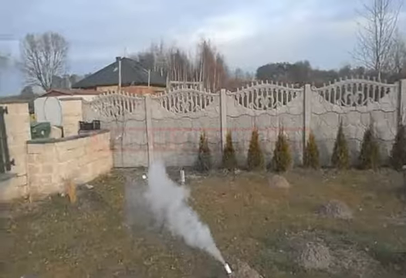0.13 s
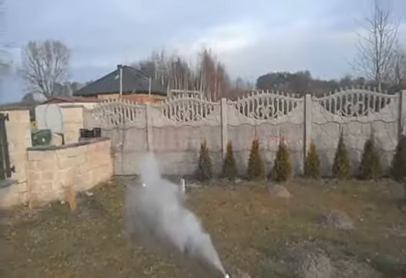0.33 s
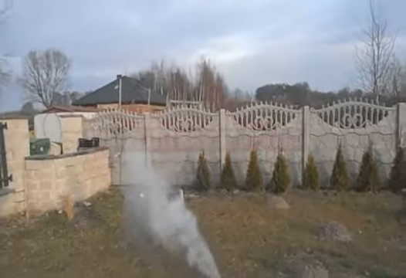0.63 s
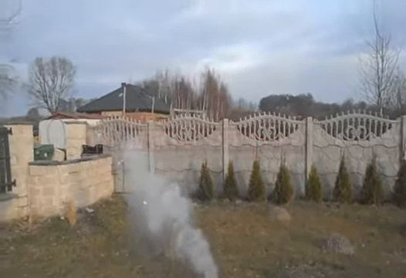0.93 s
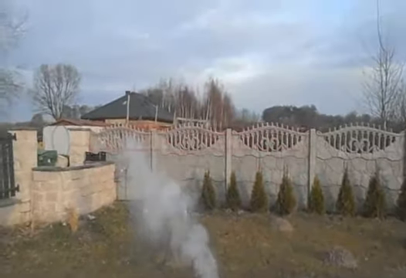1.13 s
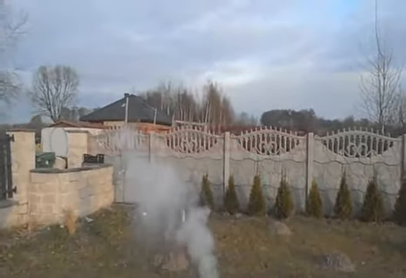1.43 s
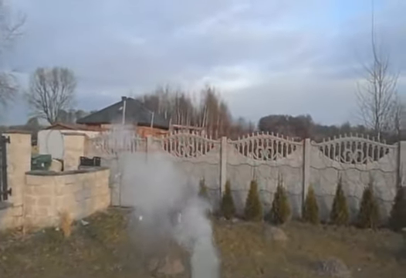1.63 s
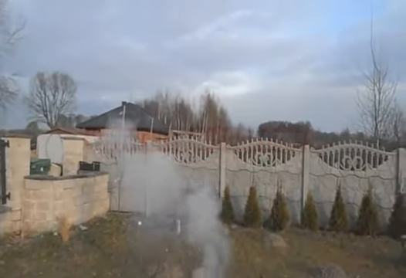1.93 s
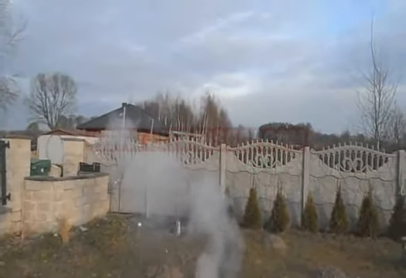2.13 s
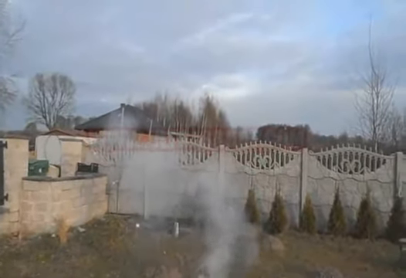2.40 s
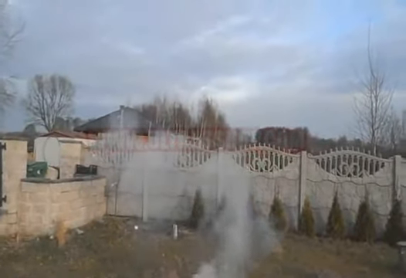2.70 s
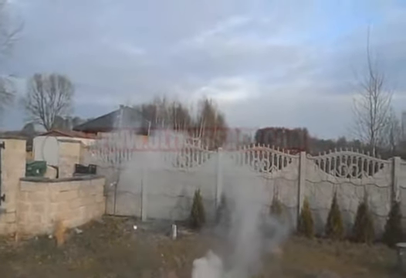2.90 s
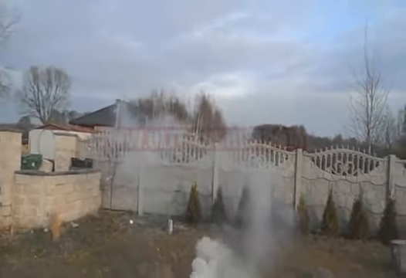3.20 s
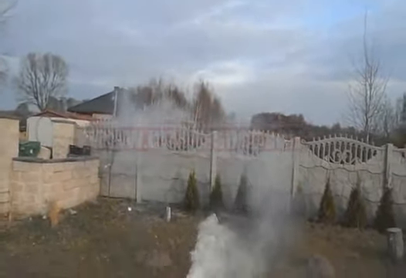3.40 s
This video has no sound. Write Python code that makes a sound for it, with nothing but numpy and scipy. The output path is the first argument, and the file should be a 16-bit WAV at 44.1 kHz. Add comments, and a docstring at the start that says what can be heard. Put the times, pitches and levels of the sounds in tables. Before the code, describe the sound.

A smoke canister on a lawn vents with a strong bright hiss, cutting in abruptly, gaining a low roar, then pulsing and fading over faint wind rumble; small mono camera microphone outdoors.

```python
"""After a short silence the sound cuts in abruptly: a smoke canister vents on a lawn near a small mono
camera microphone. Its jet is noise in four pitch regions, with turbulent flutter and slower surges.
The treble starts loudest; the low roar swells after one second, following three soft bumps of wind.
As the pressure falls the jet pulses and fades, with one more bump late on.
Low wind rumble and a distant rush, both shaped noise, run underneath from the cut-in to the end."""
import sys
import numpy as np
from scipy import signal
from scipy.fft import rfft, irfft, next_fast_len
from scipy.io import wavfile

SR = 44100
rng = np.random.default_rng(int(sys.argv[2]) if len(sys.argv) > 2 else 0)


def persist_wave(psi):
    """Save psi, clipped to +-1, as 16-bit WAV."""
    counts = np.round(np.clip(psi, -1, 1) * 32767).astype(np.int16)
    wavfile.write(sys.argv[1], SR, np.atleast_2d(counts).T)


def makeup_ratio(level_db):
    """Linear amplitude ratio for a level in decibels (20 dB per factor of ten)."""
    decades = np.asarray(level_db, float) / 20
    return 10 ** decades


N = 156555  # length in samples

# Distant rush of the neighbourhood and microphone hiss: pitch_hz, relative level_db per Hz
YARD_COLOUR = [(60, -24), (150, -5), (300, 2.5), (500, 0.5), (750, -1.5), (1600, -6.5), (4600, -17.5),
               (12000, -13), (16000, -20)]
# Wind rumble on the microphone: pitch_hz, relative level_db per Hz
WIND_COLOUR = [(8.8, -31), (15, 2.5), (68, 5), (84, -1), (98, 1), (160, -23), (210, -49), (350, -120)]
# Soft wind bumps: start_s, level_db (before the swing is rounded off), pitch_hz
BUMPS = [(0.814, -23, 45.2), (.872, -26, 60), (0.966, -24, 60.7), (2.789, -24, 80)]
# Loudness of the jet's low roar over time: time_s, level_db
ROAR_LEVEL = [(.13, -34.5), (.45, -37), (.8, -38), (1.04, -39.5), (1.18, -32), (1.35, -33.5), (1.63, -35.5),
              (1.8, -31.5), (1.9, -35.5), (2.1, -35.5), (2.3, -35.5), (2.39, -33), (2.45, -42), (2.53, -39),
              (2.62, -50), (3.55, -50)]
# Loudness of the jet's body, around its 1.2 kHz resonance: time_s, level_db
BODY_LEVEL = [(.13, -33), (.5, -33), (.9, -32.5), (1.25, -30.5), (1.5, -31), (1.8, -31), (2.15, -30),
              (2.35, -34.5), (2.42, -34), (2.47, -38), (2.52, -35), (2.7, -38.5), (2.9, -41.5),
              (3.55, -45.5)]
# Loudness of the jet between body and treble: time_s, level_db
UPPER_LEVEL = [(.13, -33.5), (.5, -34), (.9, -34.5), (1.25, -32.5), (1.6, -33.5), (2.0, -37.5), (2.28, -36),
               (2.35, -38), (2.41, -36.5), (2.46, -40.5), (2.52, -38), (2.85, -45), (3.2, -44), (3.35, -48),
               (3.55, -47)]
# Loudness of the jet's treble hiss: time_s, level_db
HISS_LEVEL = [(0.13, -20), (0.19, -19), (0.23, -20.5), (1.08, -24), (1.27, -22.5), (1.76, -25.5),
              (1.79, -28.5), (1.83, -25), (2.24, -27.5), (2.26, -24), (2.35, -30), (2.41, -26),
              (2.46, -32.5), (2.48, -28.5), (2.85, -35.5), (3.28, -35), (3.33, -39), (3.55, -35)]
# Colour of jet, ground echo and microphone housing together, in the roar: pitch_hz, relative level_db per Hz
ROAR_COLOUR = [(53, -35), (90, -7), (177, 1), (235, -0.5), (394, -10.5), (460, -14.5), (620, -13),
               (810, -47), (1360, -120)]
# The same for the body and the region above it: pitch_hz, relative level_db per Hz
BODY_COLOUR = [(550, -17), (681, -14.5), (886, -4.5), (1050, -2), (1210, 1), (1350, -3), (1470, -11),
               (1590, -23.5), (1740, -13.5), (1910, -21), (2080, -15), (2350, -19.5), (2560, -16.5),
               (2760, -9), (3000, -11.5), (3260, -13.5), (3450, -13), (3930, -7), (4160, -9), (4450, -18.5),
               (4780, -19)]
# The same for the treble: pitch_hz, relative level_db per Hz
HISS_COLOUR = [(4780, -18.5), (4950, -8.5), (5300, -3), (5700, -1), (6150, 1.5), (6590, -2.5), (7050, 0),
               (7550, -4), (7900, -12), (8400, -10), (9170, -8), (10300, -10), (10900, -15), (11800, -17),
               (12200, -24), (13300, -24), (14500, -22.5), (15700, -28)]
# Faint delayed copies of the jet: delay_s, level_db
COPIES = [(0.0116, -18.5), (.023, -13.5)]
# Narrow dips of the microphone housing: pitch_hz, width_hz, depth_db
DIPS = [(12450, 180, -9)]

YARD_DB = -43.5
WIND_DB, GUST_DB, GUST_HZ = -43, 2, 6
SPLIT_LOW_HZ, SPLIT_MID_HZ, SPLIT_HIGH_HZ = 550, 1600, 4780  # borders of the jet's four regions
FLUTTER_DB, FLUTTER_HZ = 1.01, 122  # fast turbulence in the treble; jet() scales it for other regions
SURGE_DB, SURGE_HZ = 0.48, 11       # slower surges in the treble; jet() scales them likewise
PATCH_DB, PATCH_HZ = 0.35, 5.4      # separate wander of each third octave; the roar has twice the dB
COPY_CUT_HZ = 5000
START_S, OFFSET, CUTOFF_HZ = 0.1207, -0.0026, 15730  # abrupt start, constant shift, top of the microphone


def rms_one(x):
    """Scale a signal so that its average strength (rms) is 1."""
    return x / np.sqrt(np.mean(x ** 2) + 1e-20)


def in_time(rows):
    """Read a table of times and values at every sample, with straight lines between its points."""
    times, values = np.transpose(rows)
    return np.interp(np.arange(N) / SR, times, values)


def drift(rate_hz):
    """A random wander of spread 1: noise smoothed twice, computed at every eighth sample."""
    pole = np.exp(-16 * np.pi * rate_hz / SR)
    noise = rng.standard_normal(N // 8 + 4002)
    # The first 4000 values let the smoothing settle.
    slow = signal.lfilter([1], [1, -2 * pole, pole * pole], noise)[4000:]
    slow = rms_one(slow - slow.mean())
    return np.interp(np.arange(N) / 8, np.arange(len(slow)), slow)


def coloured(points, low_hz, high_hz, patch_db):
    """Noise of a given colour, in overlapping third-octave bands that each wander in level; rms 1."""
    size = next_fast_len(N)
    hz = np.maximum(np.arange(size // 2 + 1) * SR / size, 1)
    point_hz, point_db = np.transpose(points)
    colour_db = np.interp(np.log(hz), np.log(point_hz), point_db)
    spectrum = rfft(rng.standard_normal(size)) * makeup_ratio(colour_db)
    spectrum = spectrum * (hz > low_hz) * (hz < high_hz)
    place = 3 * np.log2(hz / low_hz)  # position counted in third octaves
    out = np.zeros(N)
    for k in range(int(3 * np.log2(high_hz / low_hz)) + 2):
        share = np.clip(1 - np.abs(place - k), 0, 1)
        band = irfft(spectrum * share, size)[:N]
        out += band * makeup_ratio(patch_db * drift(PATCH_HZ))
    return rms_one(out)


def yard():
    """Distant rush and microphone hiss: broad noise whose bands wander slightly."""
    return makeup_ratio(YARD_DB) * coloured(YARD_COLOUR, 76, 16000, 0.5)


def wind():
    """Wind rumble: low noise that rises and falls in gusts."""
    gusts = makeup_ratio(WIND_DB + GUST_DB * drift(GUST_HZ))
    return gusts * coloured(WIND_COLOUR, 10, 200, 0)


def bumps():
    """Each wind bump is one rounded swing of air pressure, down then up."""
    t = np.arange(N) / SR
    out = np.zeros(N)
    for start_s, level_db, pitch_hz in BUMPS:
        turn = np.clip((t - start_s) * pitch_hz, 0, 1)
        rounding = np.sin(np.pi * turn) ** 0.96
        out -= makeup_ratio(level_db) * np.sin(2 * np.pi * turn) * rounding
    return out


def delayed_copies(near):
    """Faint delayed, dulled copies of the jet, giving its spectrum a fine ripple."""
    dull = signal.sosfilt(signal.butter(2, COPY_CUT_HZ, fs=SR, output="sos"), near)
    return sum(makeup_ratio(level_db) * np.roll(dull, int(delay_s * SR)) for delay_s, level_db in COPIES)


def jet():
    """Turbulent noise in four regions: the flow's surges move all, its flutter all but the roar."""
    flutter = FLUTTER_DB * drift(FLUTTER_HZ)
    surge = SURGE_DB * drift(SURGE_HZ)
    roar = coloured(ROAR_COLOUR, 93, SPLIT_LOW_HZ, 2.0 * PATCH_DB)
    roar = rms_one(makeup_ratio(0.7 * surge) * roar)
    body = coloured(BODY_COLOUR, SPLIT_LOW_HZ, SPLIT_MID_HZ, PATCH_DB)
    body = rms_one(makeup_ratio(1.3 * flutter + 0.43 * surge) * body)
    upper = coloured(BODY_COLOUR, SPLIT_MID_HZ, SPLIT_HIGH_HZ, PATCH_DB)
    upper = rms_one(makeup_ratio(0.89 * flutter + 0.38 * surge) * upper)
    hiss = coloured(HISS_COLOUR, SPLIT_HIGH_HZ, 16000, PATCH_DB)
    hiss = rms_one(makeup_ratio(flutter + surge) * hiss)
    near = makeup_ratio(in_time(ROAR_LEVEL)) * roar + makeup_ratio(in_time(BODY_LEVEL)) * body
    near += makeup_ratio(in_time(UPPER_LEVEL)) * upper + makeup_ratio(in_time(HISS_LEVEL)) * hiss
    return near + delayed_copies(near)


def scene():
    """Add up all sources and put the same sound in both channels."""
    mono = yard() + wind() + bumps() + jet()
    return np.array([mono, mono])


def housing(x):
    """The microphone housing weakens narrow ranges of pitch."""
    hz = np.arange(N // 2 + 1) * SR / N
    dip_db = sum(depth_db * np.exp(-((hz - pitch_hz) / width_hz) ** 2) for pitch_hz, width_hz, depth_db in DIPS)
    return irfft(rfft(x) * makeup_ratio(dip_db), N)


def band_limit(x):
    """A steep low-pass at the top of the band."""
    return signal.sosfilt(signal.butter(12, 15740, fs=SR, output="sos"), x)


def record(dry):
    """Apply the housing dips, a steep top cut, a small constant shift and the abrupt start."""
    top_cut = signal.ellip(14, 0.2, 95, CUTOFF_HZ, fs=SR, output="sos")
    heard = signal.sosfilt(top_cut, housing(dry))
    on = np.arange(N) >= START_S * SR
    mix = (heard + OFFSET) * on
    return band_limit(mix)


dry = scene()
out = record(dry)
persist_wave(out)
```